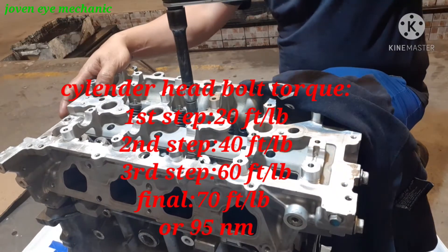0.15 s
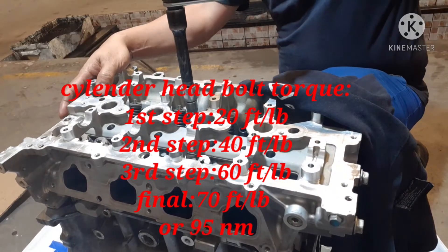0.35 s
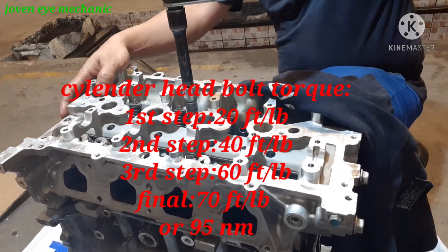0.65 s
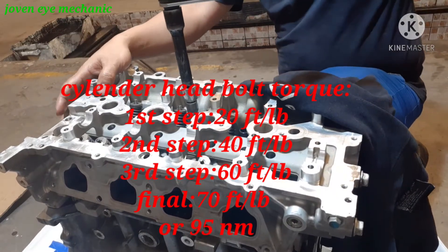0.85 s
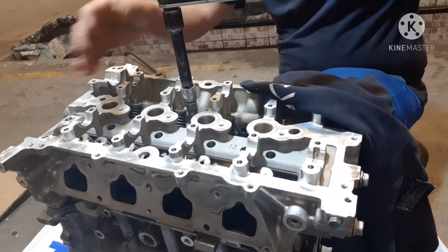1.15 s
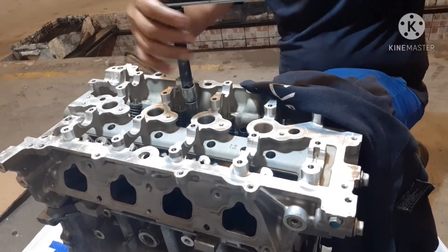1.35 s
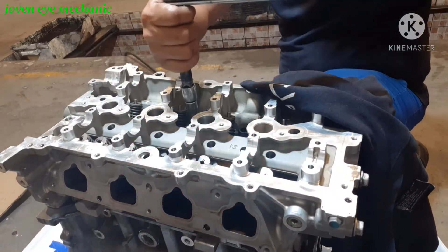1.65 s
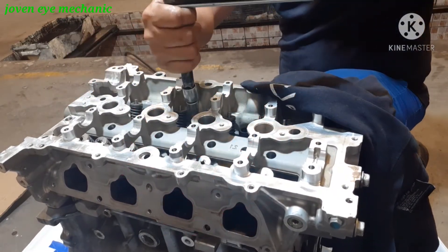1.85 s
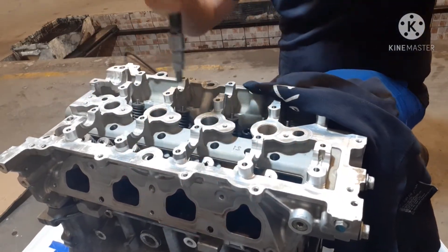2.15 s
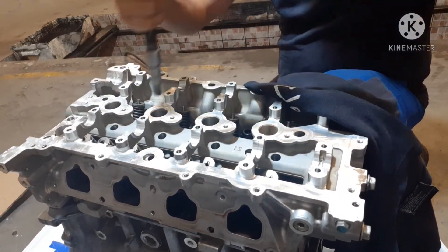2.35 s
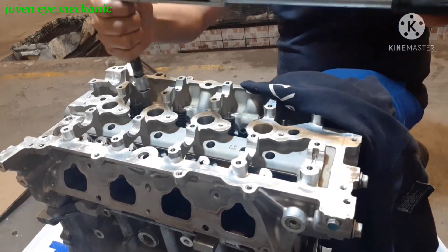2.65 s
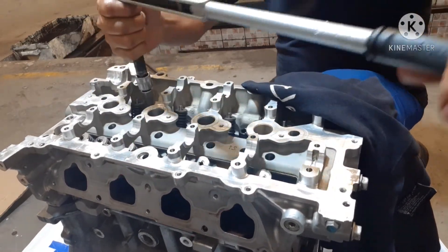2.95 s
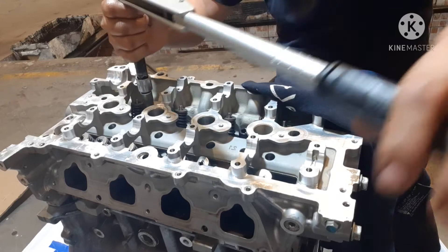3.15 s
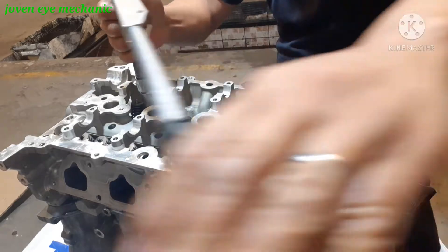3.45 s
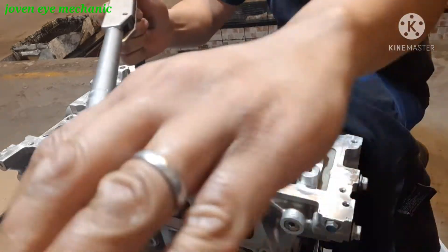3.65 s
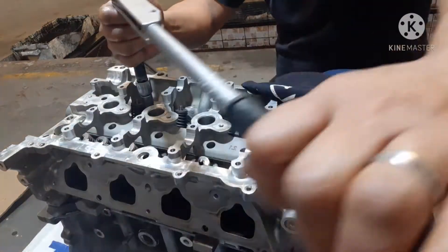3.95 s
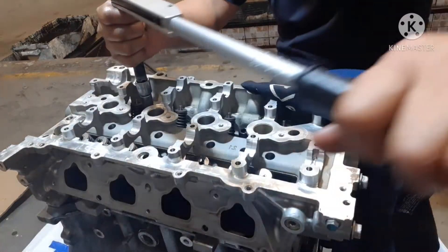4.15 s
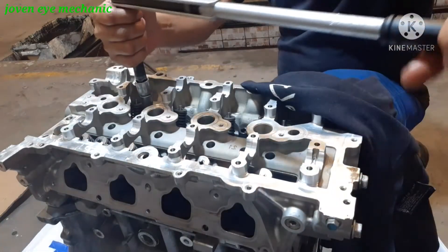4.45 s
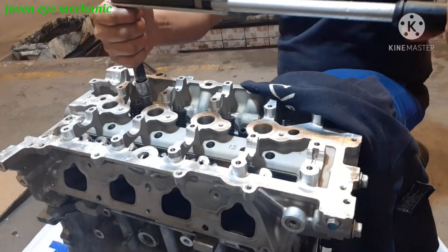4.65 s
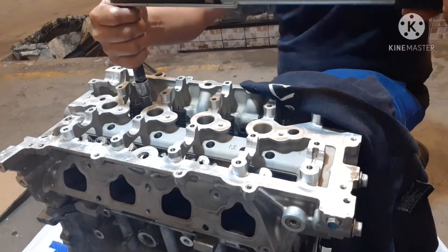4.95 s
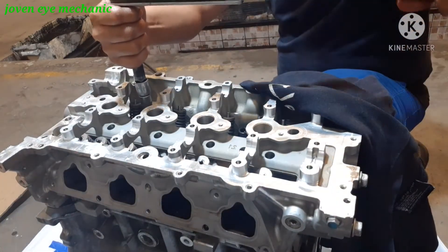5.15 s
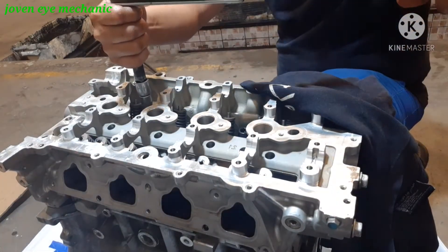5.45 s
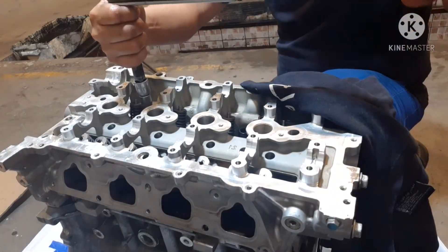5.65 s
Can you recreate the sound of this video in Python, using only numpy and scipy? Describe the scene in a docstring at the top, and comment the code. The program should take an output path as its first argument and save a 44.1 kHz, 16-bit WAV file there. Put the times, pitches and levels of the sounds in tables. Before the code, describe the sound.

Pairs of hard metallic cracks with thumps and room echo, metal tool knocks and faint squeaks between, above a soft steady fan drone.

```python
"""An open workshop: a click-type torque wrench tightens cylinder head bolts while a fan drones and whines.
At the set torque the pawl snaps over and back: a noise crack, a jolt through the microphone stand, a room echo.
Faint sine tones come and go by two of the snaps. Between bolts the loaded bar rumbles as ringing noise, socket
and ratchet knock as struck steel modes over clatter, and the ratchet squeaks in gliding near-sines.
The recorder turns its gain down after heavy bass, holds, then climbs back."""
import sys
import numpy as np
from scipy import signal
from scipy.fft import rfft, irfft, next_fast_len
from scipy.io import wavfile
from scipy.ndimage import uniform_filter1d

SR = 44100
rng = np.random.default_rng(int(sys.argv[2]) if len(sys.argv) > 2 else 0)


def wrap_up_sound(samples):
    """Save the sound to the file named by the first command line argument, as 16-bit audio."""
    columns = np.atleast_2d(samples).T
    # keep every value between -1 and 1, then stretch to whole-number steps
    tamed = np.clip(columns, -1, 1)
    steps = np.round(tamed * 32767).astype(np.int16)
    wavfile.write(sys.argv[1], SR, steps)


N = 256353

# fan drone spectrum: f/Hz, density level/dB
FAN_SPECTRUM = [(25, -51), (45, -9.5), (75, 0), (104, 4), (160, -4.5), (250, -3), (455, -3.5), (658, -9.5),
                (1790, -13), (2810, -15), (5580, -26), (9500, -33.5), (15400, -35.5), (15600, -72)]
# fan housing resonances: f/Hz, width/Hz, lift/dB
HOUSING_PEAKS = [(2401, 422, 15.5), (3192, 97, 8.5), (3994, 420, 11), (12600, 2700, 3.5)]
# how alike the fan is on both sides: f/Hz, left-right likeness (-1 to 1)
LIKENESS = [(60, 1), (130, 0.91), (290, 0.82), (640, 0.22), (1410, -0.43), (3100, 0.26), (6820, -0.12),
            (15000, 0.048)]
# motor line on left and right, before a common 3.5 dB lift: level/dB
WHINE_DB = [-47, -63]
FAN_DB, WHINE_HZ = -38, 2000.6

# pawl snaps: t/s, crack level/dB, crack fullness below 4 kHz/dB, echo level/dB,
# left jolt level/dB, right jolt level/dB, push length/s
SNAPS = [(.3660, -6.5, 0.5, 8, 1.5, -11.5, 0.0013), (0.6828, -3, -2.5, 5, 7, -6.5, 0.001),
         (5.2141, -10, -7.5, 5.5, 8, -15, 0.00168), (5.5548, 0.5, 2.5, 4.5, 1, -0.5, 0.0011)]
# crack spectrum: f/Hz, density level/dB
CRACK_SPECTRUM = [(450, 3), (800, 16), (1500, 2), (2770, -2.5), (4750, -16), (6300, 2), (12000, 5.5),
                  (16200, 4)]
# spectrum of the snap sent into the room: f/Hz, density level/dB
ECHO_SPECTRUM = [(700, -8.5), (1000, -9), (1640, -7), (2500, -6), (4000, -6), (5500, -4.5), (6500, 0.5),
                 (7500, -3), (11000, -0.5), (15300, 0.5), (15800, -28)]
# stand modes rocked by the jolt: f/Hz, level/dB, t60/s, signed size
STAND_MODES = [(55, -4, 0.11, -0.53), (110.7, -9, 0.12, 0.83), (180, 8, 0.0094, 0.75),
               (820, -17, 0.015, -0.52)]
CRACK_T60_S, RATTLE_DB, RATTLE_T60_S = 0.011, -28.5, 0.15
FRONT_PRESSURE = 0.6
CRACK_SHARED, CRACK_LEFT_LAG_S = 0.63, 0.00005  # power common to both sides; it reaches the left later
PUSH_T60_S = 0.006

# decay of the room: f/Hz, t60/s
ROOM_T60 = [(500, 0.76), (2000, 1), (5000, 0.61), (9000, 0.39), (15000, 0.24)]

# low tone that comes and goes: t/s, length/s, from f/Hz, to f/Hz, arch/Hz, level/dB
FAINT_TONES = [(0.693, 0.17, 800, 815, 0, -50), (5.433, 0.095, 775, 770, 0, -49.5),
               (5.57, 0.21, 774, 778, 0, -50)]
TONE_FADE_S = 0.02  # the squeaks use it too

# bar under load: t/s, level/dB
RUMBLE_LEVEL = [(2.5, -52), (2.7, -41.5), (2.9, -47.5), (3.02, -48), (3.1, -35.5), (3.27, -40), (3.48, -44),
                (3.6, -42.5), (3.8, -56)]
# bar and block modes: f/Hz, nominal width/Hz, level/dB
RUMBLE_MODES = [(109, 8.6, -4), (204, 170, -6.5), (289, 32, -5.5), (304, 130, -7.5), (449, 61, -12)]

# socket and ratchet knocks: t/s, level/dB, treble slope/(dB per octave), strongest low ring f/Hz, its lift/dB,
# strongest high ring f/Hz, contact/s, left-right level/dB, share of free ring time left by the gripping hand
KNOCKS = [(2.603, -27, 1.5, 1720, 7.5, 4320, 0.0036, 2, 1),
          (2.713, -32.5, -5, 1320, 9, 3650, 0.0049, 2, 0.83),
          (3.082, -30.5, -2, 1460, 13, 4340, 0.0045, 0.5, 0.62),
          (3.544, -22, 3.5, 1150, 8.5, 3600, 0.00443, 3, 0.79),
          (3.996, -35.5, -5, 950, 10.5, 3530, 0.0046, 4.4, 0.49)]
# colour common to all knocks: f/Hz, level/dB
KNOCK_COLOUR = [(600, -10), (920, -3), (1170, -4), (1600, -0.5), (2400, -5.5), (3000, -2), (3600, 2),
                (4600, -0.5), (7700, -0.3), (11500, 1.5), (15200, -5), (16000, -29)]
# modes of socket, bar and head casting: f/Hz, relative level/dB, free t60/s
STEEL_MODES = [(917, 3, 0.11), (1134, 0, 0.077), (1380, -5, 0.13), (1620, -5, 0.1), (1730, -0.5, 0.082),
               (2360, -23, 0.018), (3350, -9, 0.21), (3600, 4.5, 0.048), (3740, 0, 0.028),
               (4360, 9.5, 0.045), (4750, 7, 0.029), (5460, 13.5, 0.026), (5710, 12, 0.025),
               (6390, 6, 0.035), (7040, 11, 0.017), (7650, 4.5, 0.038), (7900, 1, .04), (9310, 0.5, 0.028),
               (10980, 8, 0.023), (12600, 8.5, 0.018)]
SLOPE_FROM_HZ = 3600
# the struck spot lifts the modes near its strongest rings
HIGH_LIFT_DB, LOW_LIFT_OCTAVES, HIGH_LIFT_OCTAVES = 7, 0.33, 0.078
CLATTER_DB, CLATTER_T60_S = 11.5, 0.14  # the countless close modes of the casting
KNOCK_ROOM_DB, TREBLE_LEFT_DB = -16.5, 1.5

# ratchet swung back, a broken squeak: t/s, length/s, from f/Hz, to f/Hz, arch/Hz, level/dB
SQUEAKS = [(4.03, .055, 13100, 12950, 50, -55), (4.09, .065, 13000, 13550, 0, -57),
           (4.125, .09, 13050, 12750, 200, -53), (4.205, .09, 12800, 12200, 500, -57),
           (4.295, .06, 12200, 12200, 220, -60), (4.42, .055, 13450, 13150, 0, -66)]

MIC_CUT_HZ, CUTOFF_HZ = 15, 16500
DUCK_AT_DB, DUCK_DB, DUCK_ATTACK_S = -14, 6, 0.0093
DUCK_HOLD_S, DUCK_RELEASE_DB_S = 1.175, 10


def from_db(db):
    """Decibels to gain."""
    return 10 ** (np.asarray(db) / 20)


def rms_one(x):
    """Scales a sound to rms 1."""
    return x / np.sqrt(np.mean(x ** 2) + 1e-20)


def at_hz(points, hz):
    """Reads an (f/Hz, value) table on a log-frequency axis."""
    table = np.array(points)
    return np.interp(np.log(np.maximum(hz, 1)), np.log(table[:, 0]), table[:, 1])


def drift(rate):
    """Slow random wander of spread about 1, with a new target rate times a second."""
    knots = rng.standard_normal(1500)
    return np.interp(np.arange(N) / SR * rate, np.arange(1500), knots) * 1.2


def coloured(noise, db_at):
    """Shapes a spectrum by a rule that gives dB over Hz."""
    size = noise.shape[-1]
    gain = from_db(db_at(np.fft.rfftfreq(size, 1 / SR)))
    return irfft(rfft(noise) * gain, size)


def add(out, s, sound):
    """Mixes a sound in at time s."""
    i = round(s * SR)
    out[..., i:i + sound.shape[-1]] += sound[..., :N - i]


def fan():
    """Air noise through the housing resonances, alike on both sides only in the bass, and the motor line."""
    size = next_fast_len(N)
    hz = np.fft.rfftfreq(size, 1 / SR)
    housing_db = sum(db / (1 + (2 * (hz - top) / width) ** 4) for top, width, db in HOUSING_PEAKS)
    gain = from_db(at_hz(FAN_SPECTRUM, hz) + housing_db)
    mid, side = rfft(rng.standard_normal((2, size))) * gain
    # the mid/side balance sets how alike left and right are
    alike = np.clip(at_hz(LIKENESS, hz), -1, 1)
    stereo = np.sqrt(1 + alike) * mid + np.sqrt(1 - alike) * side * [[1], [-1]]
    air = rms_one(irfft(stereo, size)[:, :N])
    whine = np.sin(2 * np.pi * WHINE_HZ * np.arange(N) / SR) * from_db(3.5 + 0.5 * drift(5.77))
    return from_db(FAN_DB + 0.5 * drift(6.6)) * air + from_db(WHINE_DB)[:, None] * whine


def room(x):
    """Diffuse tail: noise dying band by band, its own for each side."""
    t, tail = np.arange(SR // 2) / SR, 0
    onset = np.clip((t - 0.003) / 0.0019, 0, 1)
    for low in 150 * 2 ** np.arange(0, 6.6, 0.5):
        band = signal.butter(2, [low, low * np.sqrt(2)], "band", fs=SR, output="sos")
        fade = from_db(-60 * t / at_hz(ROOM_T60, low * 2 ** 0.2)) * onset
        tail = tail + signal.sosfilt(band, rng.standard_normal((2, len(t)))) * fade
    tail = tail / np.sqrt(np.sum(tail ** 2) / 2)
    return signal.fftconvolve(x, tail, axes=1)[:, :N]


def snap_crack(t, crack_db, full_db):
    """Coloured noise behind a first pressure front, dying fast over a fainter, longer rattle."""
    both, own = rng.standard_normal(len(t)), rng.standard_normal((2, len(t)))
    lagged = np.roll(both, round(CRACK_LEFT_LAG_S * SR))
    noise = np.sqrt(CRACK_SHARED) * np.array([lagged, both]) + np.sqrt(1 - CRACK_SHARED) * own

    def colour(hz):
        return at_hz(CRACK_SPECTRUM, hz) + at_hz([(3200, full_db), (4800, 0)], hz)

    burst = from_db(crack_db) * coloured(noise, colour)
    burst[:, :4] = FRONT_PRESSURE
    decay = from_db(-60 * t / CRACK_T60_S) + from_db(RATTLE_DB - 60 * t / RATTLE_T60_S)
    return burst * decay * from_db([[1], [-1]])


def stand_jolt(t, left_db, right_db, length):
    """A quick push through the stand, then slow rocking in its damped modes."""
    push = -np.sin(np.pi * t / length) * from_db(5.5 - 60 * t / PUSH_T60_S)
    late = np.maximum(t - length, 0)
    rock = sum(sign * np.sin(2 * np.pi * hz * late) * from_db(db - 60 * late / t60)
               for hz, db, t60, sign in STAND_MODES)
    return push * from_db([[left_db], [right_db + 1]]) + rock * from_db([[left_db], [right_db]])


def snaps():
    """Each pawl snap cracks through the air, jolts the stand and sends a coloured click into the room."""
    crack, jolt, to_room = np.zeros((3, 2, N))
    t = np.arange(SR // 4) / SR
    lead = 200  # samples of space ahead of the click for its symmetric filter
    click = coloured(np.roll(t == 0, lead) * 1.0, lambda hz: at_hz(ECHO_SPECTRUM, hz))
    click = np.outer([1, 1], click / np.sqrt(np.sum(click ** 2)))
    for s, crack_db, full_db, echo_db, left_db, right_db, length in SNAPS:
        add(crack, s, snap_crack(t, crack_db, full_db))
        add(to_room, s - lead / SR, click * from_db(echo_db))
        add(jolt, s, stand_jolt(t, left_db, right_db, length))
    # the shaken capsule runs out of travel
    return crack + 1.1 * np.tanh(jolt / 1.1) + room(to_room)


def wavering(row, waver_hz, flutter_db, rate):
    """A near sine that glides over an arch, with unsteady pitch and level."""
    s, length, from_hz, to_hz, arch_hz, db = row
    along = np.clip((np.arange(N) / SR - s) / length, 0, 1)
    glide = from_hz + (to_hz - from_hz) * along + arch_hz * np.sin(np.pi * along)
    hz = glide + waver_hz * drift(rate)
    edge = np.clip(np.minimum(along, 1 - along) * length / TONE_FADE_S, 0, 1)
    level = np.sqrt(2) * edge * from_db(db + flutter_db * drift(rate))
    return level * np.sin(2 * np.pi * np.cumsum(hz) / SR)


def faint_tones():
    """A low tone comes and goes, nearly steady in pitch with a fluttering level."""
    return sum(wavering(row, waver_hz=18, flutter_db=3.5, rate=60) for row in FAINT_TONES)


def ring(x, hz, t60):
    """Two-pole resonator: a unit click sets a sine of height 1 ringing."""
    r, w = from_db(-60 / (t60 * SR)), 2 * np.pi * hz / SR
    return signal.lfilter([0, np.sin(w)], [1, -2 * r * np.cos(w), r * r], x + 1e-18)


def rumble():
    """Low shudders of the bar and block while the bolt turns: noise through their modes."""
    noise = rng.standard_normal(N)
    body = sum(from_db(db) * rms_one(ring(noise, hz, 2.8 / width)) for hz, width, db in RUMBLE_MODES)
    t = np.arange(N) / SR
    s, level_db = np.transpose(RUMBLE_LEVEL)
    edge = np.clip(np.minimum(t - s[0], s[-1] - t) / 0.023, 0, 1)  # silent outside the rows
    return edge * from_db(np.interp(t, s, level_db)) * rms_one(body)


def knock(t, level_db, slope_db, low_hz, low_db, high_hz, contact, free):
    """Within a few milliseconds of contact every mode is struck, over a dense clatter that dies fast."""
    def octaves(hz, from_hz):
        return np.log2(np.maximum(hz, 1) / from_hz)

    def colour(hz):
        low_lift_db = low_db * np.exp(-(octaves(hz, low_hz) / LOW_LIFT_OCTAVES) ** 2)
        high_lift_db = HIGH_LIFT_DB * np.exp(-(octaves(hz, high_hz) / HIGH_LIFT_OCTAVES) ** 2)
        treble_db = slope_db * np.maximum(octaves(hz, SLOPE_FROM_HZ), 0)
        return level_db + at_hz(KNOCK_COLOUR, hz) + treble_db + low_lift_db + high_lift_db

    def clatter_colour(hz):
        return colour(hz) - 10 * np.log10(np.maximum(hz, 300) / 3000)  # bands widen upward

    after = np.maximum(t - contact / 2, 0)
    decay = from_db(-60 * after / 0.025) + 0.37 * from_db(-60 * after / CLATTER_T60_S)
    swell = np.clip(2 * t / contact, 0, 1) * decay
    sound = from_db(CLATTER_DB) * swell * coloured(rng.standard_normal((2, len(t))), clatter_colour)
    for hz, db, t60 in STEEL_MODES:
        spread_db = rng.normal(0, 2)
        struck = np.maximum(t - contact * rng.random() ** 2, 0)
        phase = 0.37 * rng.normal(0, 1, (2, 1))
        body = np.sin(2 * np.pi * hz * struck + phase) * np.clip(struck / 0.0018, 0, 1)
        sound = sound + body * from_db(db - 2.5 + colour(hz) + spread_db - 60 * struck / (free * t60))
    sound[0] = coloured(sound[0], lambda hz: at_hz([(5000, 0), (8000, TREBLE_LEFT_DB)], hz))
    return sound


def knocks():
    """Socket and ratchet knock on metal, each placed left to right, with a little room behind."""
    out, t = np.zeros((2, N)), np.arange(SR // 8) / SR
    for s, level_db, slope_db, low_hz, low_db, high_hz, contact, pan_db, free in KNOCKS:
        sound = knock(t, level_db, slope_db, low_hz, low_db, high_hz, contact, free)
        add(out, s - 0.001, sound * from_db(pan_db * np.array([[0.5], [-0.5]])))
    return out + from_db(KNOCK_ROOM_DB) * room(out)


def squeaks():
    """The ratchet swung back: a broken high squeak, gliding and fluttering fast."""
    return sum(wavering(row, waver_hz=30, flutter_db=5, rate=200) for row in SQUEAKS)


def scene():
    """Fan, wrench and the faint tones together."""
    return fan() + snaps() + faint_tones() + rumble() + knocks() + squeaks()


def record(dry):
    """Gain drops after a heavy bass overload, holds, and climbs back; peaks clip; the top is cut."""
    t = np.arange(N) / SR
    dry = signal.sosfilt(signal.butter(1, MIC_CUT_HZ, "high", fs=SR, output="sos"), dry)
    # the left side's bass power over the last 400 samples triggers the gain
    bass = signal.sosfilt(signal.butter(2, 400, fs=SR, output="sos"), dry[0])
    loud = uniform_filter1d(bass ** 2, size=400, origin=199) > from_db(2 * DUCK_AT_DB)
    since = t - np.maximum.accumulate(np.where(loud, t, -99))
    release_db = DUCK_RELEASE_DB_S * np.maximum(since - DUCK_HOLD_S, 0)
    duck_db = np.clip(DUCK_DB - release_db, 0, DUCK_DB)
    r = np.exp(-1 / (DUCK_ATTACK_S * SR))
    smooth_db = signal.lfilter([1 - r], [1, -r], duck_db)
    wet = np.clip(dry * from_db(-smooth_db), -0.97, 0.97)
    return signal.sosfilt(signal.cheby2(16, 60, CUTOFF_HZ, fs=SR, output="sos"), wet)


dry = scene()
out = record(dry)
wrap_up_sound(out)
```